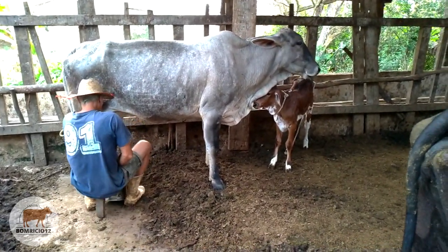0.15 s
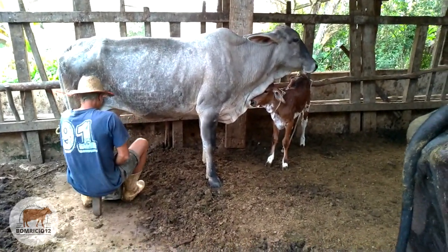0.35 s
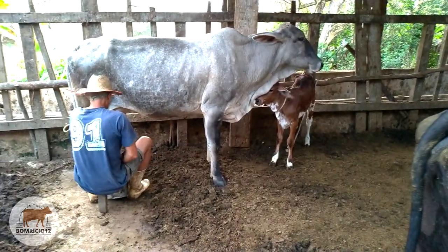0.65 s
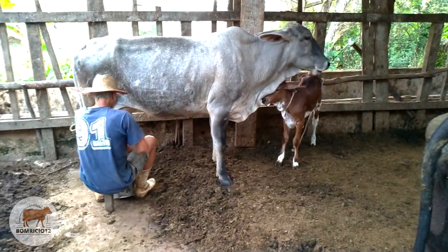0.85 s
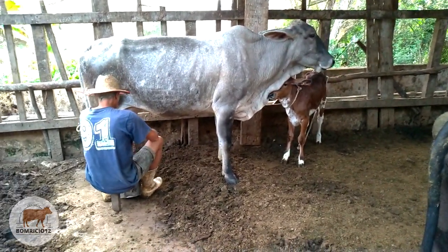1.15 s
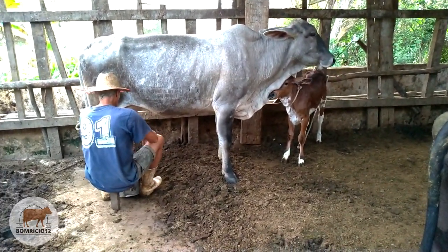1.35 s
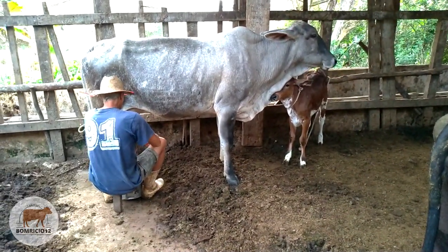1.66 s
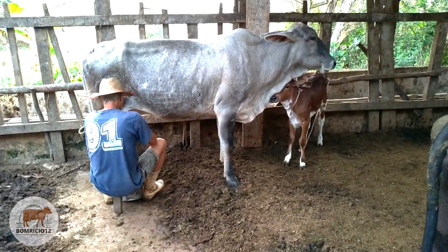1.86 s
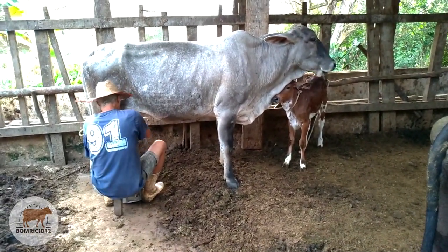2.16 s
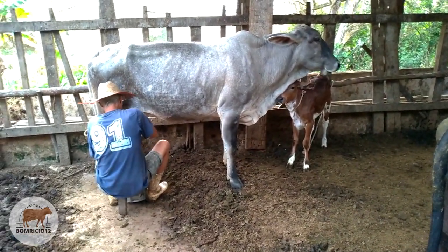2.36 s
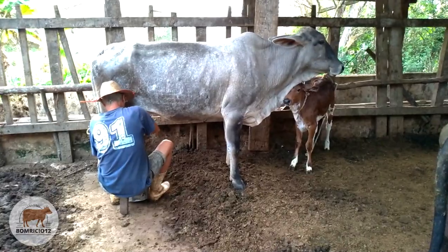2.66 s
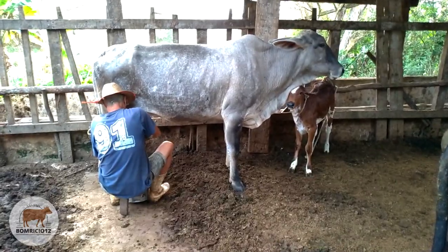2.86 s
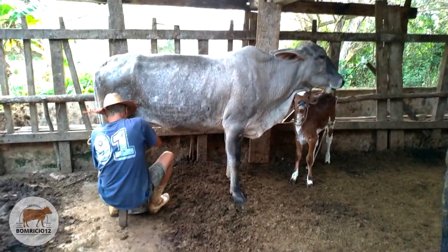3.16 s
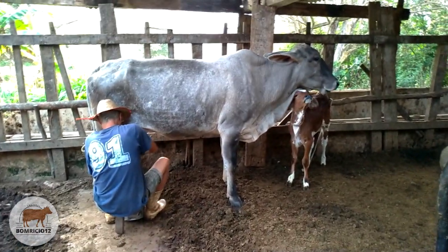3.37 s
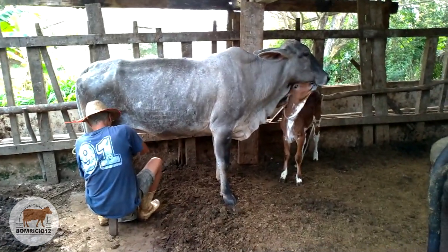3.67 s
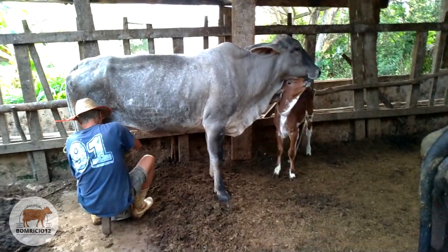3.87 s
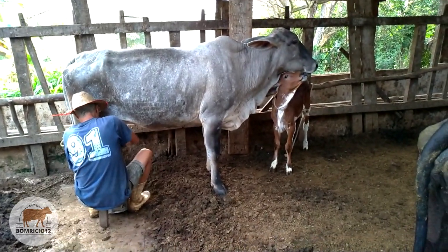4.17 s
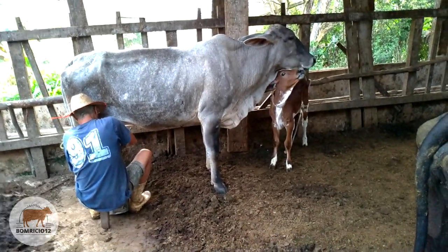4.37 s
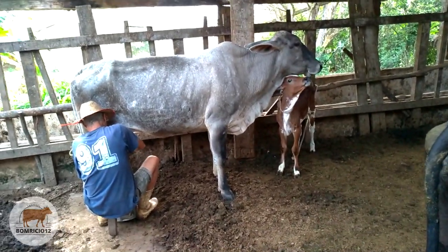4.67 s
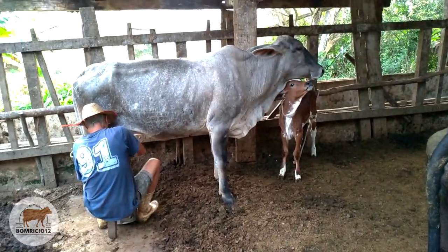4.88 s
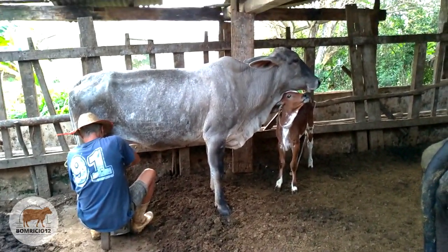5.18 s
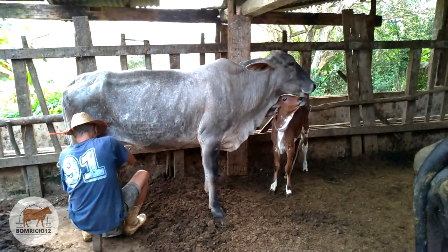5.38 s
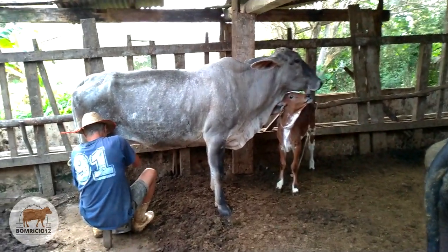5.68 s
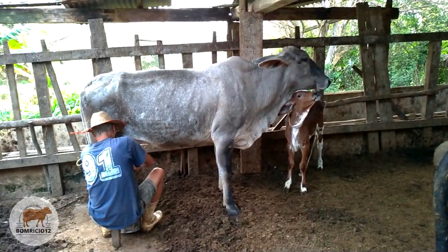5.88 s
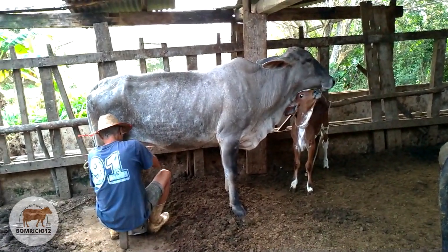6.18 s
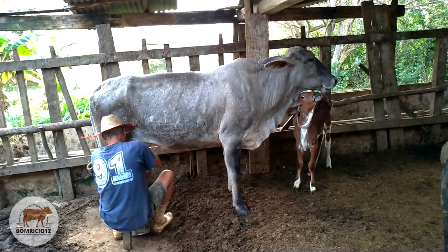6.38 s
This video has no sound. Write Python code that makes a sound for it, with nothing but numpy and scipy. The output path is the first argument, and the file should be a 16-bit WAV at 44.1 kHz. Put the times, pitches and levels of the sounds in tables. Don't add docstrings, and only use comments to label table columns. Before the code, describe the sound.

A cow is milked by hand a few metres away, slightly to the right. Steady jets, roughly two a second, hiss as fine spray, drum the pail wall and plunge into bubbling froth. Chicks peep continually on all sides with short shed echoes. The pail knocks softly early on, hooves thud dully, and a hen clucks once near the end. Insects and yard hum lie behind.

```python
import sys
import numpy as np
from scipy import signal
from scipy.fft import rfft, irfft
from scipy.io import wavfile
from scipy.ndimage import uniform_filter1d

SR = 44100
rng = np.random.default_rng(int(sys.argv[2]) if len(sys.argv) > 2 else 0)


def generate_wav(sig):
    pcm = np.round(np.clip(np.atleast_2d(sig).T, -1, 1) * 32767).astype(np.int16)
    wavfile.write(sys.argv[1], SR, pcm)


def boost_factor(decibels):
    exponent = np.asarray(decibels, float) / 20
    return 10 ** exponent


N = 287973

# (start [s], swell [s], jet force [dB], froth churned [dB], softness of opening [dB])
JETS = [(-.1, 0.11, -0.5, -39.5, -28), (0.333, 0.099, -0.5, -42.5, 0.5), (0.788, 0.13, -1.5, -39.5, 2),
        (1.259, 0.086, 3, -38, 4), (1.722, 0.079, 1, -46, 4), (2.337, 0.12, -1, -42.5, 2),
        (2.785, .12, 1, -37, 4), (3.208, 0.092, -0.5, -36.5, 3.5), (3.623, 0.088, 0.5, -35.5, 4.5),
        (4.018, 0.069, 1.5, -34.5, 2.5), (4.412, 0.062, 0.5, -40, 3), (4.812, 0.057, 2, -36, 3.5),
        (5.181, 0.09, 1, -36, 11.5), (5.598, 0.054, 0.5, -41, 2.5), (6.066, 0.25, -2, -44.5, 4)]


def unit(x):
    return x / np.sqrt(np.mean(x ** 2) + 1e-20)


def in_time(rows):
    s, *columns = np.transpose(rows)
    return [np.interp(np.arange(N) / SR, s, c) for c in columns]


def at_hz(points, hz):
    points = np.array(points)
    return np.interp(np.log(hz + 1), np.log(points[:, 0]), points[:, 1])


def colour(x, spectrum):
    return irfft(rfft(x) * boost_factor(at_hz(spectrum, np.fft.rfftfreq(N, 1 / SR))), N)


def passing(x, order, hz, kind):
    return signal.sosfilt(signal.butter(order, hz, kind, fs=SR, output="sos"), x)


def drift(rate):
    knots = rng.standard_normal(int(N / SR * 400) + 2)
    return np.interp(np.arange(N) / SR * min(rate, 399), np.arange(len(knots)), knots)


def ring(clicks, hz, t60):
    r = boost_factor(-60 / (t60 * SR))
    w = 2 * np.pi * hz / SR
    return signal.lfilter([0, np.sin(w)], [1, -2 * r * np.cos(w), r * r], clicks + 1e-18)


def grains(per_s, spread_db):
    sizes = boost_factor(spread_db * np.minimum(rng.exponential(1, N), 4)) * rng.choice([-1, 1], N)
    return sizes * (rng.random(N) < per_s / SR)


def blips(rows, cycles):
    out = np.zeros(N)
    t = np.arange(2000) / SR
    for s, peak_db, hz in rows:
        fading = boost_factor(peak_db + 11.0 - 60 * t * hz / cycles)
        body = np.sin(2 * np.pi * hz * t * (1 + 0.0035 * hz * t)) * fading
        out[round(s * SR):round(s * SR) + len(t)] += body
    return out


def swells(rows, rise_s, t60):
    out = np.zeros(N + SR)
    t = np.arange(SR // 2) / SR
    for s, peak_db, hz in rows:
        shape = (1 - np.exp(-t / rise_s)) * boost_factor(peak_db + 1.5 - 60 * t / t60)
        out[round(s * SR):][:len(t)] += np.sin(2 * np.pi * hz * t) * shape
    return out[:N]


def shed(x, t60, low_hz):
    t = np.arange(SR // 2) / SR
    echoes = rng.standard_normal((2, len(t))) * boost_factor(-60 * t / t60) * (t > .003)
    echoes = passing(echoes, 2, low_hz, "high")
    echoes /= np.sqrt(np.mean(np.sum(echoes ** 2, axis=1)))
    return signal.fftconvolve(x * np.ones((2, 1)), echoes, axes=1)[:, :N]


def yard():
    # (pitch [Hz], level [dB per Hz])
    yard_spectrum = [(13, -44), (22, -51), (59, 6), (117, -11), (182, -1.5), (324, -4), (546, -5.5),
                     (1780, -15), (3940, -4.5), (4900, -2.5), (5470, -16.5), (7600, -31), (9210, -22),
                     (13500, -25.5), (15500, -15)]
    # (pitch [Hz], left-right likeness [0 to 1])
    likeness = [(25, 0.34), (130, 0.69), (300, 1), (700, 0.36), (1500, 0), (3000, 0), (15000, 0)]
    alike = np.clip(at_hz(likeness, np.fft.rfftfreq(N, 1 / SR)), 0, 1)
    shared, apart = rfft(rng.standard_normal((2, N)))
    sides = [np.sqrt(1 + alike) * shared + sign * np.sqrt(1 - alike) * apart for sign in (1, -1)]
    swell_db = 2.2 * drift(4)
    return boost_factor(-58 + swell_db) * unit(colour(irfft(sides, N), yard_spectrum))


def breeze():
    both, left, right = passing(rng.standard_normal((3, N)), 2, [45, 150], "band")
    gusts = boost_factor(4.5 * drift(6))
    return boost_factor(-71.5) * gusts * unit(np.array([both + 0.25 * left, both + 0.28 * right]))


def hoof():
    # (time [s], peak level [dB], pitch [Hz])
    thuds = [
        (.337, -46.5, 112),
        (.5, -46.5, 94),
        (1.085, -48, 90),
        (3.0, -49.5, 89),
        (5.065, -53, 91),
        (6.05, -52.5, 72.4),
    ]
    return swells(thuds, rise_s=0.013, t60=0.21)


def peeps():
    # (time [s], top [Hz], end [Hz], level [dB])
    slides = [(3.775, 4010, 2390, -53), (0.294, 3700, 2550, -49.5), (0.444, 3700, 2474, -46.5),
              (.571, 3650, 2700, -58.5), (0.699, 3830, 2530, -58), (0.997, 3960, 2500, -46.5),
              (1.116, 3750, 2530, -51), (1.279, 3830, 2390, -52), (1.486, 3840, 2840, -54),
              (1.664, 3800, 2610, -55), (1.714, 3830, 2570, -74), (1.865, 3770, 2314, -48),
              (2.006, 3700, 2380, -46), (1.315, 3300, 2480, -58), (2.334, 3870, 3000, -55),
              (2.608, 3896, 2490, -46.5), (2.743, 4060, 2640, -49), (2.92, 3940, 2710, -51.5),
              (3.85, 3450, 2730, -53.5), (4.372, 3860, 2650, -49), (4.511, 3860, 3030, -57),
              (5.033, 3970, 2770, -50), (5.148, 3930, 2494, -48.5), (5.309, 3820, 2485, -52.5),
              (5.472, 4130, 2650, -49), (5.675, 3360, 2440, -46.5), (5.851, 3740, 2430, -51.5),
              (5.954, 4070, 2640, -49), (6.074, 3600, 2605, -54), (6.293, 3710, 3060, -51.5)]
    # (time [s], held [s], top [Hz], level [dB])
    sudden = [(1.326, 0.041, 4440, -51), (2.021, 0.062, 4416, -52), (2.207, 0.052, 4340, -51.5),
              (2.438, 0.025, 4280, -50.5), (2.817, 0.028, 4370, -52), (3.344, 0.04, 4390, -56.5),
              (3.586, .035, 3960, -51), (0.14, 0.039, 4460, -50.5), (3.435, 0.023, 3990, -56),
              (4.163, 0.025, 4570, -51), (4.256, 0.028, 4170, -52), (4.959, 0.034, 4150, -50),
              (5.084, 0.031, 3960, -49), (6.123, 0.027, 3840, -52)]
    # (time [s], length [s], top [Hz], end [Hz], level [dB])
    droops = [(.002, 0.016, 3850, 3440, -48), (0.286, 0.053, 4530, 3900, -54),
              (0.869, 0.05, 4500, 3780, -51.5), (.895, 0.092, 3960, 3120, -53.5),
              (1.021, 0.074, 4150, 3020, -51.5), (1.164, 0.052, 4530, 4490, -53),
              (1.2, .035, 4400, 3700, -49), (1.539, 0.074, 2815, 2710, -59),
              (1.808, 0.092, 4580, 3930, -50.5), (2.289, .063, 4220, 3570, -55.5),
              (2.984, 0.079, 4410, 3670, -50), (3.147, 0.094, 4370, 3620, -52),
              (3.755, 0.027, 4124, 3930, -49.5), (3.8, 0.022, 3930, 3380, -47.5),
              (3.841, 0.051, 4440, 3930, -49.5), (3.909, 0.097, 3760, 3710, -53),
              (3.919, 0.05, 4250, 3800, -55), (3.989, 0.072, 4460, 3840, -51),
              (4.696, 0.18, 4568, 3296, -54), (4.919, 0.12, 4600, 3940, -51),
              (5.033, 0.11, 4003, 3896, -47), (5.247, 0.099, 4540, 4100, -53),
              (5.452, 0.088, 4540, 4120, -50), (5.932, 0.13, 4645, 3880, -52),
              (6.23, .068, 4430, 4140, -56)]
    # (time [s], length [s], top [Hz], end [Hz], level [dB])
    strays = [(.17, .04, 3900, 2550, -55), (4.5, .05, 3900, 3800, -56), (3.6, .04, 3800, 4000, -56),
              (5.06, .09, 3950, 3800, -54), (5.2, .05, 3400, 3300, -57), (5.94, .06, 4000, 4050, -56),
              (.049, .025, 2630, 2800, -60), (1.575, .07, 4050, 2900, -58), (2.597, .03, 4300, 3900, -56),
              (3.06, .05, 4000, 3200, -57), (3.665, .03, 3840, 3660, -52), (1.38, .04, 4400, 4200, -57),
              (.39, .02, 4100, 3900, -57), (4.09, .04, 4400, 4200, -55), (5.0, .06, 4600, 4450, -55),
              (5.72, .08, 4000, 3900, -58), (6.27, .05, 4350, 4100, -57), (6.335, .07, 3300, 3050, -57)]
    # (time [s], length [s], first [Hz], last [Hz], level [dB])
    whines = [
        (1.09, .17, 9850, 11500, -69),
        (1.465, .125, 9500, 7500, -69),
    ]
    held_share = 0.24
    calls = [(s, 0.012, 0.042, top, end, db) for s, top, end, db in slides]
    calls += [(s, held, 0.03, top, 2505, db) for s, held, top, db in sudden]
    for s, length, top, end, db in [*droops, *strays, *whines]:
        calls.append((s, held_share * length, (1 - held_share) * length, top, end, db))
    return calls


def chicks():
    # (pitch [Hz], level [dB])
    beak = [(2400, -1), (3000, 3), (3600, -5), (4100, -2), (4600, 0)]
    push_db_per_octave, overtone_db = 3.5, -22
    calls = peeps()
    out = np.zeros((2, N + SR))
    place = rng.uniform(-1, 1, (len(calls), 2))
    waver, flutter = drift(250), drift(200)
    for (s, held, falling, top_hz, end_hz, level_db), (pan, lag) in zip(calls, place):
        t = np.arange(round((held + falling + .006) * SR)) / SR
        now = np.minimum(round(s * SR) + np.arange(len(t)), N - 1)
        slide = np.clip((t - held) / falling, 0, 1) ** 1.5
        hz = top_hz + (end_hz - top_hz) * slide + 50 * waver[now]
        effort_db = push_db_per_octave * np.log2(top_hz / hz) + at_hz(beak, hz)
        phase = 2 * np.pi * np.cumsum(hz) / SR
        fades = np.clip(t / .006, 0, 1) * np.clip((t[-1] - t) / .008, 0, 1)
        shape = fades * boost_factor(3.2 * flutter[now] - 1)
        voice = np.sin(phase) + boost_factor(overtone_db) * np.sin(2 * phase)
        note = boost_factor(level_db + 3.0 + effort_db) * shape * voice
        for side, sign in enumerate([1, -1]):
            at = round(s * SR + 10 + 9 * sign * lag)
            out[side, at:at + len(t)] += note * boost_factor(2.5 * sign * pan)
    return out[:, :N]


def hen():
    # (time [s], pitch [Hz], level [dB])
    cluck = [
        (5.187, 830, -48),
        (5.202, 658.8, -38),
        (5.212, 638, -27),
        (5.222, 658.7, -29),
        (5.226, 449.4, -28),
        (5.243, 434.2, -28),
        (5.27, 402.5, -36),
        (5.31, 413, -40.5),
        (5.34, 410, -68),
    ]
    # (pitch [Hz], width [Hz], level [dB])
    throat = [(922, 330, 12), (1300, 130, -4), (2140, 120, -13)]
    pitch_hz, level_db = in_time(cluck)
    turns = np.floor(np.cumsum(pitch_hz * (1 + 0.039 * drift(200))) / SR)
    sizes = 1 + 0.3 * (-1) ** turns + 0.23 * rng.standard_normal(N)
    pulses = np.diff(turns, prepend=0) * sizes
    voice = sum(boost_factor(peak_db) * ring(pulses, hz, 3.3 / width_hz) for hz, width_hz, peak_db in throat)
    s = np.arange(N) / SR
    return unit(voice) * boost_factor(level_db) * (s > cluck[0][0]) * (s < cluck[-1][0])


def follow(peaks_db, peak_db, soft, knee_s, knee_db, fade, left_db):
    open_s = 0.0085
    t = np.arange(N) / SR
    out = np.full(N, np.median(peaks_db) + peak_db + left_db)
    for (s, swell, _, _, opening_db), db in zip(JETS, peaks_db):
        times = np.cumsum([s - open_s, open_s, swell, knee_s, 1])
        shape = [-60, -soft * opening_db, 0, knee_db, knee_db - fade]
        out = np.maximum(out, db + peak_db + np.interp(t, times, shape))
    return out


def spray(level_db):
    # (pitch [Hz], level [dB per Hz])
    spray_spectrum = [(900, -7), (2000, -4), (4000, -1.5), (6000, -5), (7300, -9), (9000, -9.5),
                      (12000, -13.5), (15500, -21)]
    fine = [unit(colour(grains(5000, spread_db=2.5), spray_spectrum)) for side in "LR"]
    sputter_db = 2.6 * (0.76 * drift(60) + .5 * drift(16))
    return np.array(fine) * boost_factor(level_db + 9.5 + sputter_db) * boost_factor([[.4], [-.4]])


def splats():
    # (time [s], peak level [dB])
    bursts = [
        (.865, -54),
        (2.447, -46.5),
        (3.272, -54),
        (3.628, -48.5),
        (3.687, -41),
        (4.031, -44),
        (4.525, -46),
        (5.717, -45),
    ]
    t, level = np.arange(N) / SR, np.zeros(N)
    for s, peak_db in bursts:
        level += (t > s) * boost_factor(peak_db - 60 * np.abs(t - s) / 0.07)
    return passing(level * rng.standard_normal((2, N)), 2, [4500, 11700], "band")


def wall_notes():
    # (time [s], peak level [dB], pitch [Hz])
    surges = [(.002, -36.5, 341), (.028, -33, 246.5), (.141, -33.5, 342.4), (.436, -42.5, 200),
              (.903, -31.5, 202), (1.786, -42, 324), (1.848, -41, 222), (2.356, -41.5, 338),
              (2.878, -36.5, 269), (3.425, -44.5, 311), (3.5, -43.5, 333), (3.686, -37.5, 324),
              (4.575, -32, 327.8), (5.715, -36.5, 276.4), (6.368, -38.5, 351), (2.789, -44, 227),
              (3.217, -47.5, 322), (3.628, -48, 248), (4.028, -39, 323), (4.42, -43, 315),
              (4.818, -49, 237), (5.61, -39, 323), (6.259, -38.5, 318)]
    return swells(surges, rise_s=0.0043, t60=0.21)


def pail(level_db):
    # (pitch [Hz], level under the jet [dB], t60 [s], level under a bump [dB])
    modes = [(145, -14, 0.16, -43), (181, -2, 0.12, -47), (221.6, -4, 0.1, 6), (275.5, -6.5, 0.16, -2.5),
             (323, -2.5, 0.14, -10.5), (347, -4, 0.13, 2.5), (415, -9, 0.17, -3.5), (495, -7.5, 0.068, -15)]
    # (time [s], peak level [dB])
    knocks = [(0.004, -25.5), (0.023, -25), (0.049, -29.5), (0.140, -18.5), (0.151, -18.5), (0.164, -21.5),
              (0.195, -28.5), (0.22, -31.5), (0.238, -31), (0.762, -36), (0.915, -34), (1.997, -43),
              (2.447, -24), (4.587, -47)]
    out, bumps = np.zeros(N), np.zeros(N)
    for s, peak_db in knocks:
        bumps[round(s * SR)] = boost_factor(peak_db - 7.0)
    push = np.hanning(round(0.0021 * SR))
    bumps = signal.lfilter(1.08 * push / push.sum(), [1], bumps)
    for hz, jet_db, t60, bump_db in modes:
        force = unit(grains(500, spread_db=5.0)) * boost_factor(level_db - 27 + 3.0 * drift(25))
        out += ring(boost_factor(jet_db) * force + boost_factor(bump_db) * bumps, hz, t60)
    return out


def drops():
    # (time [s], peak level [dB], pitch [Hz])
    plops = [
        (0.338, -56, 637),
        (2.372, -50, 990),
        (2.707, -56.5, 1040),
        (3.491, -53, 850),
    ]
    # (time [s], peak level [dB], pitch [Hz])
    ticks = [(0.0972, -57.5, 6760), (0.7522, -56, 5620), (0.8594, -55, 5570), (2.0413, -50.5, 5620),
             (3.272, -54, 6200), (3.6905, -45, 6070), (3.7973, -68, 5960), (4.5256, -46, 8560),
             (5.002, -53.5, 5600), (5.0709, -55, 5900), (5.2118, -54, 5640), (5.5099, -52.5, 6070),
             (4.5258, -55, 11200), (3.686, -52, 11900), (4.4214, -54, 11100), (1.261, -56, 10400),
             (5.2121, -54, 10800)]
    return blips(plops, cycles=27.0) + blips(ticks, cycles=92.0)


def air_pockets():
    # (time [s], peak level [dB], pitch [Hz])
    pockets = [(.439, -30, 1448), (.446, -35, 996), (.866, -44, 750), (1.318, -45, 1100),
               (1.382, -46.5, 794), (1.788, -33.5, 1507), (1.828, -39, 915), (2.44, -32, 1200),
               (2.843, -34.5, 955), (2.898, -34, 1007), (2.9, -37, 1920), (3.274, -36.5, 1590),
               (3.684, -30, 922), (3.699, -28, 875), (3.712, -31.5, 930), (3.735, -32, 898),
               (4.076, -35, 900), (4.092, -25.5, 1232), (4.1, -33, 915), (4.484, -28, 927),
               (4.498, -29, 867), (4.49, -34, 1870), (4.881, -42, 980), (5.69, -41, 1006), (6.28, -49, 939)]
    return swells(pockets, rise_s=0.0017, t60=0.057)


def froth(level_db):
    # (pitch [Hz], level [dB per Hz])
    froth_spectrum = [(260, -44), (450, -14), (620, -11.5), (760, -8), (934, -4), (1080, -8), (1350, -8.5),
                      (1940, -11), (2200, -16.5), (3200, -19.5), (4160, -53), (7040, -120)]
    # (time [s], peak level [dB], main bubble [Hz], t60 [s])
    plunges = [(0.09, -40, 1120, 0.11), (0.434, -22, 1400, 0.22), (0.867, -22, 750, 0.13),
               (2.828, -30, 654, 0.079), (4.074, -31, 910, 0.068), (4.841, -39.5, 965, 0.23),
               (4.52, -39, 900, .2), (1.318, -51, 1100, 0.11), (1.382, -36, 790, 0.29),
               (1.787, -25, 1770, 0.27), (1.831, -33, 980, 0.34), (2.439, -28.5, 1020, 0.4),
               (2.842, -23, 895, 0.049), (2.899, -20, 1210, 0.13), (3.272, -30, 1400, 0.29),
               (3.683, -22, 900, 0.15), (3.723, -47, 947, 0.087), (4.088, -21, 1410, 0.19),
               (4.481, -15.5, 1000, 0.1), (4.499, -32.5, 850, 0.33), (4.881, -31, 980, 0.16),
               (5.663, -31, 1230, 0.36), (5.69, -24.5, 1260, 0.27), (6.233, -37, 1120, 0.66),
               (6.298, -29, 883, 0.14)]
    clicks = unit(grains(2500, spread_db=1.5) * boost_factor(2.2 * drift(60) + 2.17 * drift(150)))
    pitches = np.geomspace(450, 3200, 26)
    dealt = rng.integers(0, 26, N)
    t, out = np.arange(SR // 4) / SR, np.zeros(N)
    for k, hz in enumerate(pitches):
        force = np.append(boost_factor(level_db - 6.0), 0 * t)
        for s, peak_db, main_hz, t60 in plunges:
            near_db = -7 * min(abs(np.log2(hz / main_hz)), 1.5)
            fading = boost_factor(peak_db - 7.0 + near_db - 60 * t / max(t60, .05))
            force[round(s * SR) - 200:][:len(t)] += (1 - np.exp(-t / 0.0039)) * fading
        bubbles = ring(clicks * force[:N] * (dealt == k), hz, 33.0 / hz)
        out += boost_factor(at_hz(froth_spectrum, hz) - 23.5) * np.sqrt(hz / 900) * bubbles * np.sqrt(hz / 30)
    return out


def scene():
    background = yard() + breeze() + hoof()

    calls, cluck = chicks(), hen()
    birds = boost_factor(-3.5) * calls + boost_factor(-.5) * shed(calls, t60=.24, low_hz=500)
    birds += cluck + boost_factor(1.5) * shed(cluck, t60=0.37, low_hz=505)

    _, _, force_db, churn_db, _ = np.transpose(JETS)
    spray_db = follow(force_db, peak_db=-60.5, soft=0.67, knee_s=0.1066, knee_db=-5, fade=78, left_db=-14)
    wall_db = follow(force_db, peak_db=-41, soft=2.5, knee_s=0.1, knee_db=-3, fade=109.5, left_db=-22)
    froth_db = follow(churn_db, peak_db=0, soft=4, knee_s=0.1467, knee_db=-15.5, fade=113, left_db=-25)

    wall = pail(wall_db) + boost_factor(4.0) * wall_notes()
    wall = passing(wall, 6, 140, "high")
    bubbles = froth(froth_db) + drops() + boost_factor(3.5) * air_pockets()
    left = bubbles * boost_factor(-4.5) + wall * boost_factor(-6.0)
    right = bubbles * boost_factor(0.0) + wall * boost_factor(-5.5)
    milk = np.array([left, np.roll(right, 6)])
    milk += boost_factor(-5.5) * shed(bubbles, t60=0.14, low_hz=590)
    milk += boost_factor(-22.0) * shed(wall, t60=1.0, low_hz=220)
    milk += spray(spray_db) + splats() * boost_factor([[1.5], [-1.5]])
    return background + birds + milk


def lose_faint_tones(x, size=1024, start=72):
    # (pitch [Hz], level against the neighbours [dB])
    faint = [(300, -45), (1500, -25), (2800, -19), (4300, -22), (5300, -12), (7300, 0), (8600, -6),
             (10000, 0), (13000, 2)]
    patch_db = 13
    n, k = np.arange(2 * size)[:, None], np.arange(size)
    window = np.sin(np.pi * (n + .5) / size / 2)
    tones = np.cos(np.pi / size * (n + .5 + size / 2) * (k + .5))
    basis = window * tones * np.sqrt(2 / size)
    count = N // size + 3
    padded = np.zeros((2, (count + 1) * size))
    padded[:, 2 * size - start:][:, :N] = x
    blocks = padded.reshape(2, -1, size)
    lines = np.concatenate([blocks[:, :-1], blocks[:, 1:]], axis=2) @ basis
    patches = uniform_filter1d(rng.standard_normal((count, size // 8)), size=3, axis=0)
    waver = np.sqrt(3) * patches.repeat(8, axis=1)
    step = boost_factor(at_hz(faint, (k + .5) * SR / size / 2) + patch_db * waver)
    level = np.sqrt(uniform_filter1d(lines ** 2, size=48, axis=2))
    level = level ** .7 * np.median(level, axis=1, keepdims=True) ** .3
    frames = (lines * (np.abs(lines) > step * level)) @ basis.T
    blocks[:, 1:-1] = frames[:, 1:, :size] + frames[:, :-1, size:]
    return padded[:, 2 * size - start:][:, :N]


def top_cut(x):
    return signal.sosfilt(signal.butter(12, 15670, fs=SR, output="sos"), x)


def record(dry):
    left, right = passing(dry, 4, 42, "high")
    mid, side = lose_faint_tones(np.array([left + right, left - right]) / 2)
    return top_cut(np.array([mid + side, mid - side]))


dry = scene()
out = record(dry)
generate_wav(out)
```